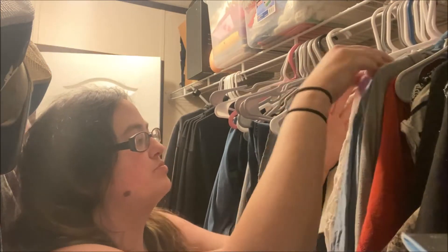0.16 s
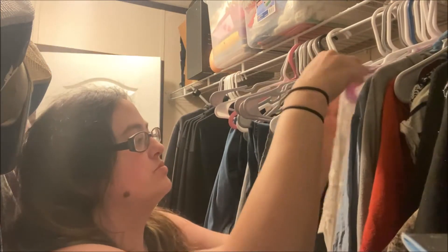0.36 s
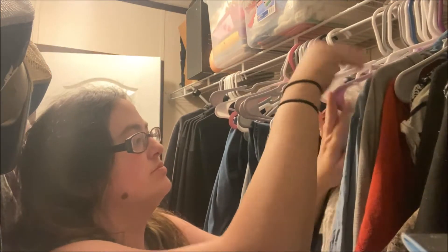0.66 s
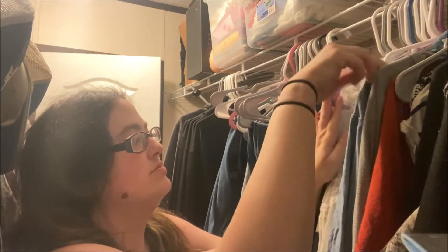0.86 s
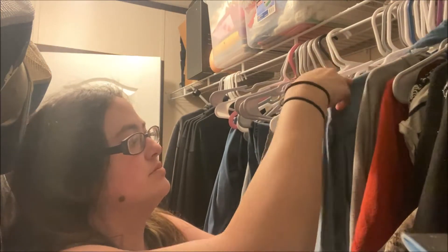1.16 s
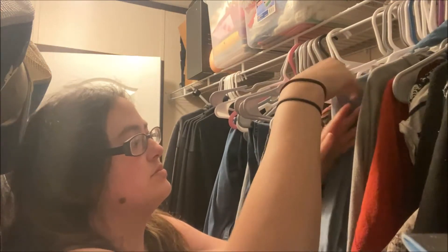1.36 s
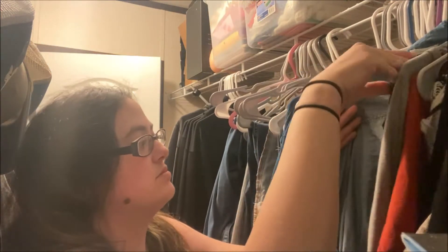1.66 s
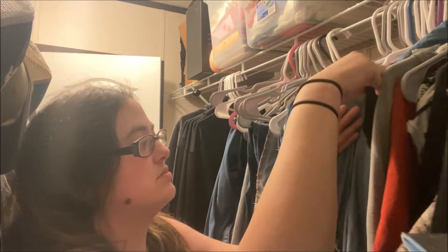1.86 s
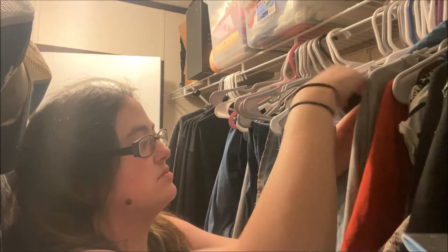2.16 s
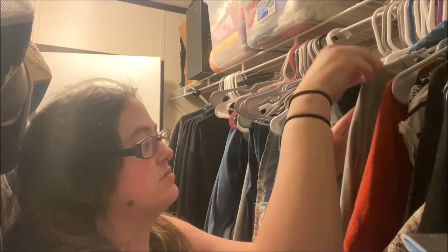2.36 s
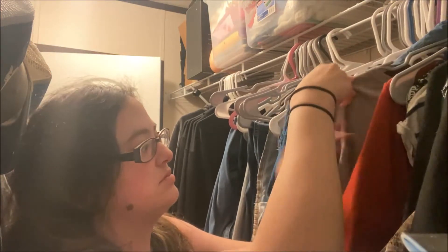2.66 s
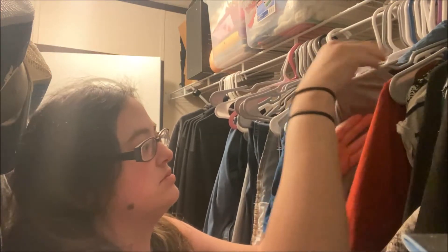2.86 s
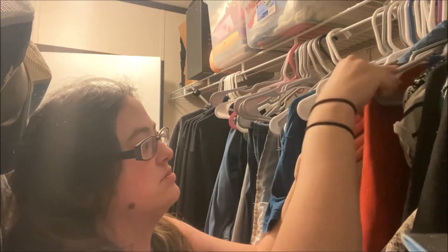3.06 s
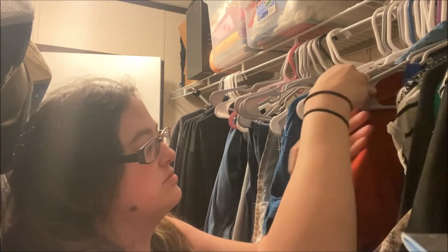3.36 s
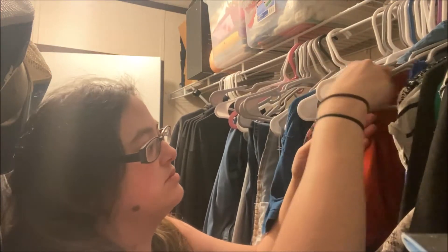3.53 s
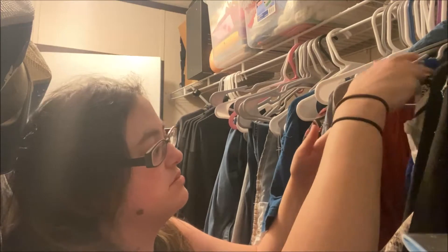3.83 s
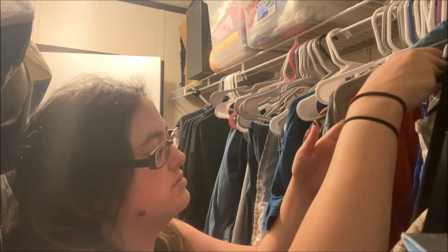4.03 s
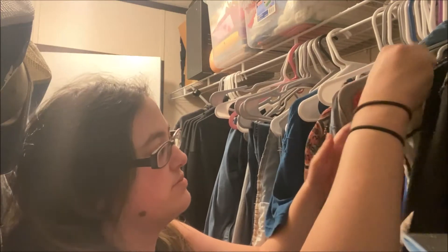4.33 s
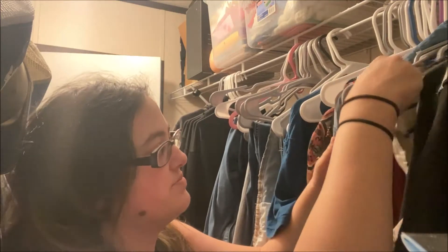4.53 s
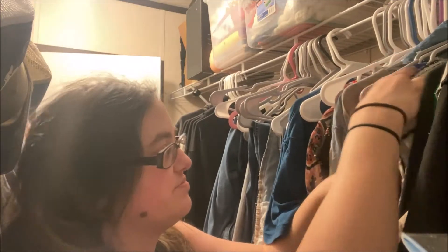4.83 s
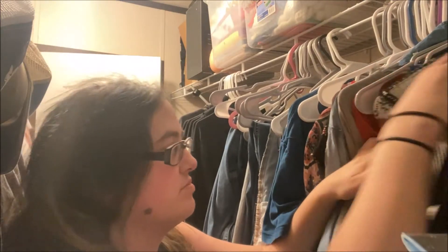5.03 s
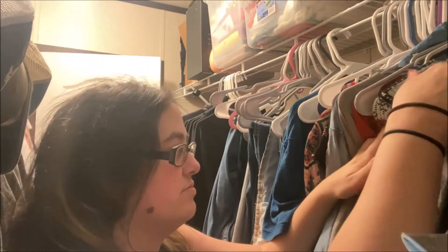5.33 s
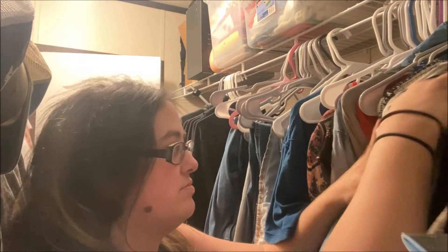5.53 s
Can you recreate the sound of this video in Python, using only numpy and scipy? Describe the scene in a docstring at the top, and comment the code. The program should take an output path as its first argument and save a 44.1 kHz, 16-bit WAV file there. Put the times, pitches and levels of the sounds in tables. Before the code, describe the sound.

Plastic hangers clack and snap irregularly along a wire rod in a small clothes-filled closet, with soft cloth brushes and a faint low hum.

```python
"""Clothes on plastic hangers are pushed along a wire rod in a small, crowded closet.
Ventilation hums faintly throughout: coloured noise. From the start, hooks snap over the rod and
hangers clack: bursts of chatter ring through resonances, and each also makes the shelf boom.
Cloth brushes past between them as slowly wavering noise. From about 0.8 s a hook squeaks now and
then: noise keeps two high pitches singing. The strongest clack comes at about 2.6 s."""
import sys
import numpy as np
from scipy import signal
from scipy.fft import rfft, irfft, next_fast_len
from scipy.io import wavfile

SR = 44100
rng = np.random.default_rng(int(sys.argv[2]) if len(sys.argv) > 2 else 0)


def to_wav(s):
    """Save 16-bit WAV."""
    ch = np.atleast_2d(s).T  # columns
    pcm = np.round(np.clip(ch, -1, 1) * 32767)  # PCM
    wavfile.write(sys.argv[1], SR, pcm.astype(np.int16))


N = 251149

# Hanger contacts: [start_s, strength_db, hardness_db, plastic_db, knock_hz, clack_hz, contact_t60_s]
# Hardness above 0: hook on rod; below 0: padded shoulder on wall. plastic_db: extra for plastic on plastic.
CONTACTS = [(0.0444, -64.5, -4, 9.5, 390, 2550, 0.011), (.2992, -79, 4.5, 1, 420, 1690, 0.054),
            (0.5164, -53, -6.5, -3, 1140, 2410, 0.2), (0.5385, -30.5, 5, -2, 440, 3485, 0.064),
            (0.6067, -64.5, 4, -4, 470, 2520, 0.15), (0.6276, -55.5, 0.5, 1, 420, 2650, 0.044),
            (0.7154, -62, 6.5, -3, 430, 1970, .018), (0.724, -59.5, 0.5, -0.5, 420, 2140, 0.086),
            (1.133, -59.5, -17, -1, 990, 1504, 0.014), (1.1766, -52, 5.5, 1.5, 800, 4530, .018),
            (1.2068, -38.5, 2, 0, 275, 2670, 0.017), (1.418, -50.5, -9, -1.5, 1020, 2310, 0.021),
            (1.431, -62.5, 9, 4, 420, 3950, 0.058), (1.538, -61.5, 2.5, -11, 390, 4860, 0.012),
            (2.153, -58.5, -6, -6.5, 750, 1600, 0.04), (2.1645, -53.5, -6.5, -5.5, 750, 1823, 0.064),
            (2.61, -53.5, -5.5, -9, 791, 4900, 0.16), (2.6266, -27.5, 10, 0.5, 896, 4905, 0.026),
            (3.2535, -41, 3.5, -2.5, 900, 4860, 0.022), (3.265, -39, 5, -0.5, 580, 4900, 0.027),
            (3.6176, -63.5, 3.5, 5.5, 1200, 3840, 0.0074), (3.7708, -60, 4.5, 2.5, 400, 2130, 0.019),
            (4.374, -75, 11.5, -2, 390, 4740, 0.022), (5.045, -56, 4, 3, 420, 4300, .04),
            (5.5432, -62.5, 5, -2, 670, 3580, .018)]
# Colour of the bare contact where a hook rings or scrapes: [pitch_hz, level_db]
HOOK_COLOUR = [(4300, -26), (5800, -2), (8800, -0.5), (10000, -9.5), (12000, -42.5)]

LENGTH = SR // 2   # samples in one short sound
AGE = np.arange(LENGTH) / SR   # seconds since that sound began
OPPOSITE = [[1], [-1]]   # left as it is, right upside down


def from_db(db):
    """Turns decibels into a gain."""
    return 10 ** (np.asarray(db) / 20)


def rms_one(x):
    """Scales a sound to rms 1."""
    return x / np.sqrt(np.mean(x ** 2) + 1e-20)


def energy_one(x):
    """Gives every channel unit energy."""
    return x / np.sqrt(np.sum(x ** 2, axis=-1, keepdims=True) + 1e-20)


def at_level(x, db, seconds):
    """Scales a blow to an rms level over its first moments."""
    return from_db(db) * x / np.sqrt(np.mean(x[:, :round(seconds * SR)] ** 2) + 1e-20)


def add(out, s, sound):
    """Mixes a sound in at time s."""
    start = max(round(s * SR), 0)
    piece = sound[..., :max(N - start, 0)]
    out[..., start:start + piece.shape[-1]] += piece


def decay(t60):
    """An envelope that falls by 60 dB in t60 seconds."""
    return from_db(-60 * AGE / max(t60, .001))


def flutter(db, per_s):
    """A gain that wanders at random, moving between per_s new values a second."""
    place = np.arange(N) / SR * per_s
    return from_db(db * np.interp(place, np.arange(N), rng.standard_normal(N)))


def convolve(x, response):
    """Lets every sample of x set off the response."""
    return signal.fftconvolve(np.atleast_2d(x), np.atleast_2d(response), axes=1)[:, :LENGTH]


def colour(x, points):
    """Filters a sound to follow (Hz, dB) points, without sounding early (minimum phase)."""
    size = 2 * next_fast_len(x.shape[-1] // 2 + 1)
    hz, db = np.transpose(points)
    freqs = np.maximum(np.fft.rfftfreq(size, 1 / SR), 1)
    curve_db = np.interp(np.log(freqs), np.log(hz), db)
    # Folding the cepstrum forward in time gives the minimum phase
    cepstrum = irfft(np.log(from_db(curve_db)))
    cepstrum[1:size // 2] *= 2
    cepstrum[size // 2 + 1:] = 0
    response = np.exp(rfft(cepstrum))
    return irfft(rfft(x, size) * response)[..., :x.shape[-1]]


def resonate(x, resonances):
    """Adds the ringing of each (Hz, width Hz, dB) resonance, one after the other."""
    for hz, width_hz, db in resonances:
        r = np.exp(-np.pi * width_hz / SR)   # how much of the swing is left one sample later
        poles = [1, -2 * r * np.cos(2 * np.pi * hz / SR), r * r]
        ringing = signal.lfilter([1, 0, -1], poles, x + 1e-18)
        x = x + from_db(db) * (1 - r * r) / 2 * ringing
    return x


def stereo_noise(points, side_db):
    """Coloured noise shared by the ears, plus a part opposite in them at side_db; rms 1."""
    mid, side = colour(rng.standard_normal((2, N)), points)
    return rms_one(mid + from_db(side_db) * side * OPPOSITE)


def ventilation(hum_db=-50.5, air_db=-74.5):
    """A low hum, nearly alike in both ears, under a trace of hiss."""
    # Colour of the ventilation hum: [pitch_hz, level_db]
    hum_colour = [(14, -31), (30, -16), (45, -2), (56, -1), (65, -1.5), (76, -2.5), (92, -11.5),
                  (108, -14.5), (122, -7.5), (134, -6.5), (146, -4.5), (170, -16.5), (205, -22.5),
                  (260, -35), (450, -47.5), (900, -89)]
    # Colour of the still air's hiss: [pitch_hz, level_db]
    air_colour = [(200, -11.5), (380, 2), (700, -6), (1500, -12), (3000, -19.5), (8000, -20),
                  (10500, -28.5), (14800, -24), (15700, -53)]
    hum = from_db(hum_db) * stereo_noise(hum_colour, side_db=-12.5)
    air = from_db(air_db) * stereo_noise(air_colour, side_db=1.5)
    return hum + air


def contact(t60, grain_db=5.5):
    """A snap followed by fine chatter; the longer the surfaces rub, the less the snap counts."""
    clean_t60 = .016   # here snap and chatter have equal energy
    grains = from_db(grain_db * rng.standard_normal(LENGTH))
    chatter = rng.standard_normal(LENGTH) * grains * decay(t60)
    force = energy_one(chatter) * t60 / clean_t60
    force[0] += 1   # the snap
    return energy_one(force)


def closet(contact_t60, lag_ms, t60, near_db, tail_db, build_s=0.0017, wall_s=.013, wall_db=-12.5):
    """A contact reaches the ears directly, scattered by hangers, off a wall, then as a short tail."""
    force = contact(contact_t60)
    lag = round(abs(lag_ms) * SR / 1000)
    late = np.pad(force, (lag, 0))[:LENGTH]
    direct = np.array([late, force] if lag_ms > 0 else [force, late])   # left is late if lag_ms > 0
    near, wall, far = rng.standard_normal((3, 2, LENGTH))
    scatter = from_db(near_db) * energy_one(near * decay(contact_t60))
    wall_fade = np.roll(decay(contact_t60), round(wall_s * SR))
    echo = from_db(wall_db) * energy_one(wall * wall_fade)
    tail_shape = decay(t60) * (1 - np.exp(-AGE / build_s))
    tail = from_db(tail_db) * energy_one(far * tail_shape)
    return direct + scatter + echo + tail


def shares(strength_db, hardness_db):
    """Hard contacts ring, soft ones knock; plastic gives under force while the tip gets brighter."""
    light_touch_db = -55   # strength of an ordinary light contact
    force_db = strength_db - light_touch_db
    knock_db, ring_db = strength_db - hardness_db, strength_db + hardness_db
    clack_db = strength_db + 2.3 - .21 * force_db - .25 * hardness_db
    tick_db = ring_db - 5.5 + .11 * (ring_db - light_touch_db)
    return knock_db, clack_db, ring_db, tick_db


def part(x, points, resonances, db):
    """What one part radiates: the contact in that part's colour and resonances."""
    return at_level(resonate(colour(x, points), resonances), db, .012)


def hangers(knock_width_hz=150, knock_peak_db=-0.5, clack_width_hz=700, clack_peak_db=11.5):
    """Each contact sounds wall, hanger body, hook and hook tip; its place sets knock and clack pitch."""
    # Resonances of the wall: [pitch_hz, width_hz, ringing_db]
    wall_modes = [(264, 20, 9.5), (369, 18, 10.5), (482, 17, 4.5), (544, 36, 6.5), (960, 90, 2),
                  (1228, 69, 2)]
    # Resonances of the hanger's body: [pitch_hz, width_hz, ringing_db]
    body_modes = [(1967, 320, -2), (2500, 17, -0.5), (3117, 170, -2.5), (3670, 48, 1), (4900, 29, -3.5)]
    # Resonances of the hook: [pitch_hz, width_hz, ringing_db]
    hook_modes = [(6034, 79, 7), (6700, 70, -2.5), (7120, 89, -3.5), (8120, 150, 1), (9080, 110, 1.5)]
    # Resonances of the hook's tip: [pitch_hz, width_hz, ringing_db]
    tip_modes = [(11730, 87, 1.2), (13000, 150, 2.2), (13820, 90, 4.7)]
    # Colour of the bare contact in the wall's register: [pitch_hz, level_db]
    knock_colour = [(170, -24.5), (270, -3), (400, -0.5), (600, -4), (1200, -6.5), (1500, -6.5),
                    (2100, -29), (4000, -56.5)]
    # Colour of the bare contact in the body's register: [pitch_hz, level_db]
    clack_colour = [(800, -25.5), (1600, -4), (2300, 1), (3000, -4.5), (3700, -4.5), (4200, -3), (5100, 1),
                    (7500, -30)]
    # Colour of the bare contact in the tip's register: [pitch_hz, level_db]
    tick_colour = [(8000, -31), (11200, 0), (13300, 1), (14800, -7.5), (15600, -24.5), (16200, -49)]
    tail_t60_s, bass_tail_t60_s = .095, .16
    plastic_ring = .5   # dB the body's own pitch gains per dB of plastic-on-plastic blow

    out = np.zeros((2, N))
    for s, strength_db, hardness_db, plastic_db, knock_hz, clack_hz, t60 in CONTACTS:
        knock_db, clack_db, ring_db, tick_db = shares(strength_db, hardness_db)
        knock = closet(t60, lag_ms=.06, t60=bass_tail_t60_s, near_db=-3.5, tail_db=-1.5)
        knock = knock * OPPOSITE   # reaches the ears in opposite phase
        clack = closet(t60, lag_ms=.3, t60=tail_t60_s, near_db=4.0, tail_db=-1.0)
        ring = closet(t60, lag_ms=-.14, t60=tail_t60_s, near_db=-3.5, tail_db=-6.5)
        tick = closet(t60, lag_ms=-.14, t60=tail_t60_s, near_db=0.5, tail_db=-11.5)
        knock_mode = (knock_hz, knock_width_hz, knock_peak_db)
        clack_mode = (clack_hz, clack_width_hz, clack_peak_db + plastic_ring * plastic_db)
        add(out, s, part(knock, knock_colour, wall_modes + [knock_mode], knock_db))
        add(out, s, part(clack, clack_colour, body_modes + [clack_mode], clack_db + plastic_db))
        add(out, s, part(ring, HOOK_COLOUR, hook_modes, ring_db))
        add(out, s, part(tick, tick_colour, tip_modes, tick_db))
    return out


def struck(modes, spread_db=3.5):
    """Decaying sines; every blow shares its force among them differently."""
    total = np.zeros(LENGTH)
    for k, (hz, db, t60) in enumerate(modes):
        gain = from_db(db + spread_db * rng.standard_normal())
        sign = (-1) ** k   # every other sine starts downward
        total += gain * sign * decay(t60) * np.sin(2 * np.pi * hz * AGE)
    return total


def shelf(swell_s=0.008, side_db=-17.5, boom_db=1.5, most_db=-41):
    """The loaded shelf swings up a moment after a blow, then booms by its strength, up to a ceiling."""
    # Ways the loaded shelf swings: [pitch_hz, level_db, t60_s]
    shelf_modes = [(113, -1, 0.27), (147, -3.5, 0.3), (167, 0, 0.16), (192.65, -3, 0.13),
                   (237, -6.5, 0.082)]
    out = np.zeros((2, N))
    swell = 1 - np.exp(-(AGE / swell_s) ** 2)
    for s, strength_db, *_ in CONTACTS:
        boom = struck(shelf_modes) + from_db(side_db) * struck(shelf_modes) * OPPOSITE
        db = min(strength_db + boom_db, most_db)
        add(out, s, at_level(boom * swell, db, .05))
    return out


def cloth():
    """Each brush swells and fades; folds make it uneven and catching fibres make it grainy."""
    # Garments brushing past: [middle_s, length_s, level_db, weight_db (dull rub over fibre hiss)]
    brushes = [(0.068, 0.066, -69.5, 10), (.264, 0.044, -91.5, 28), (0.493, 0.24, -76, -4),
               (.938, 0.031, -73.5, 6), (1.153, .16, -64.5, 1), (1.464, 0.17, -72.5, 16),
               (2.043, 0.1, -67.5, 11), (2.216, 0.12, -70.5, 9.5), (2.61, 0.2, -68.5, 0.5),
               (2.871, 0.047, -71.5, 13), (3.252, 0.18, -73, 14.5), (4.373, .091, -75, -7),
               (4.766, .087, -65.5, -9), (4.985, 0.15, -72.5, 10.5), (5.123, .14, -72.5, 8),
               (5.356, .065, -76.5, -24), (5.58, 0.076, -74, 3)]
    # Colour of the fibres' hiss: [pitch_hz, level_db]
    fibre_colour = [(700, -30), (2300, -1.5), (5000, -3), (8000, 2.5), (10500, -14.5), (13000, -0.5),
                    (14800, -12.5), (15800, -38)]
    # Colour of the folds' dull rub: [pitch_hz, level_db]
    rub_colour = [(40, -13.5), (140, 17), (280, 4.5), (700, -5.5), (1600, -11.5), (3500, -17.5),
                  (9000, -52.5)]
    t = np.arange(N) / SR
    hiss, rub = np.zeros((2, N))
    for s, length, db, weight_db in brushes:
        stroke = from_db(db) * np.exp(-(1.6 * (t - s) / length) ** 2)
        hiss += stroke
        rub += from_db(weight_db) * stroke
    fibres = hiss * flutter(db=4.0, per_s=28) * stereo_noise(fibre_colour, side_db=-2.5)
    folds = rub * flutter(db=3.5, per_s=28) * stereo_noise(rub_colour, side_db=-0.5)
    grain = flutter(db=1.5, per_s=500)
    return grain * (fibres + folds)


def squeaks(low_hz=5660, high_hz=13520, high_db=-12.0, scrape_db=-7.5, detune=0.012):
    """Dense slips under a short stroke keep two hook pitches singing, a little off each time."""
    # A hook sticking and slipping on the rod: [middle_s, level_db]
    slip_times = [(.785, -73), (1.624, -69.5), (1.711, -80), (2.894, -70), (5.098, -57), (5.251, -70.5),
                  (5.325, -65.5), (5.667, -67)]
    stroke_s, ring_t60_s = .022, .028
    out = np.zeros((2, N))
    stroke = np.exp(-2 * (AGE / stroke_s - 2) ** 2)   # strongest two stroke_s after it begins
    for s, db in slip_times:
        phase = 2 * np.pi * AGE * (1 + detune * rng.standard_normal())
        pitches = np.sin(low_hz * phase) + from_db(high_db) * np.sin(high_hz * phase)
        hook = energy_one(decay(ring_t60_s) * pitches)
        slips = rng.standard_normal((2, LENGTH))
        scrape = from_db(scrape_db) * rms_one(colour(slips, HOOK_COLOUR))
        add(out, s - 2 * stroke_s, from_db(db) * stroke * (convolve(slips, hook) + scrape))
    return out


def scene():
    """All layers together, the ventilation slightly stronger on the right."""
    air = ventilation() * from_db([[-.5], [.5]])
    return air + hangers() + shelf() + cloth() + squeaks()


def record(dry):
    """The sharpest peaks are rounded, then the top is cut steeply."""
    cutoff_hz = 16300
    rounded = .85 * np.tanh(dry / .85)
    steep_cut = signal.ellip(10, .1, 80, cutoff_hz, fs=SR, output="sos")
    return signal.sosfilt(steep_cut, rounded)


dry = scene()
out = record(dry)
to_wav(out)
```